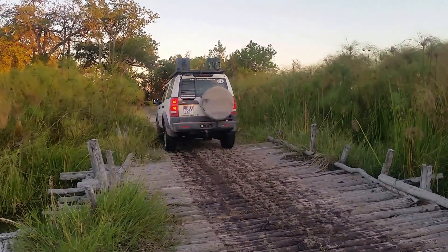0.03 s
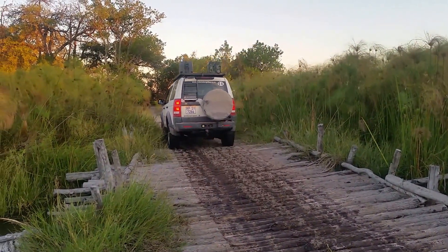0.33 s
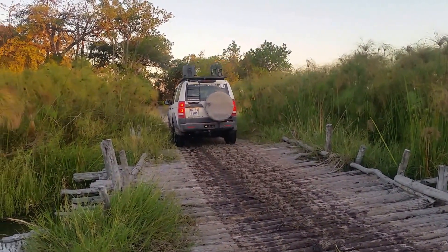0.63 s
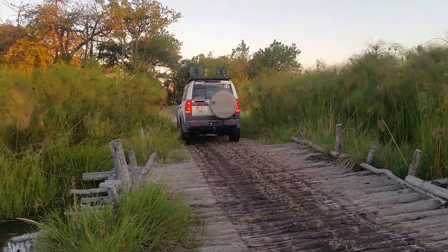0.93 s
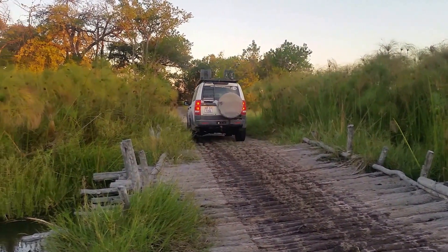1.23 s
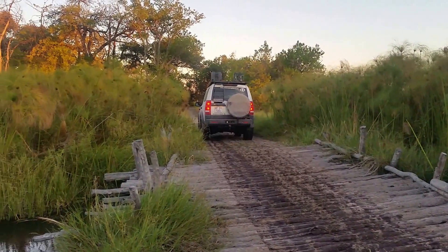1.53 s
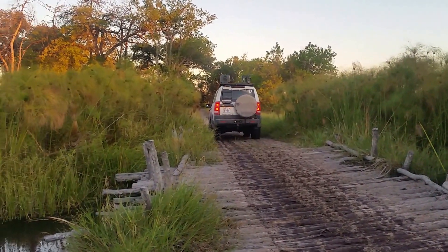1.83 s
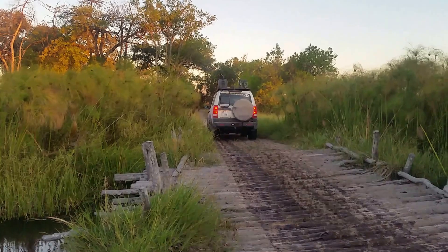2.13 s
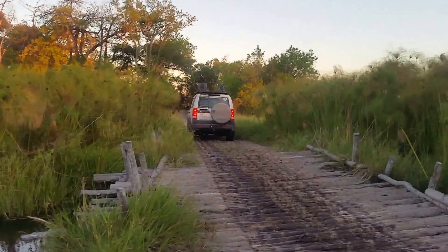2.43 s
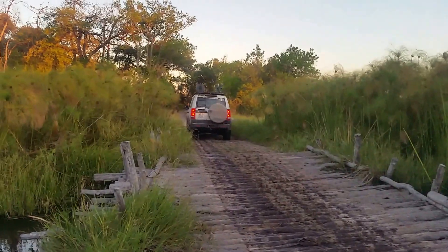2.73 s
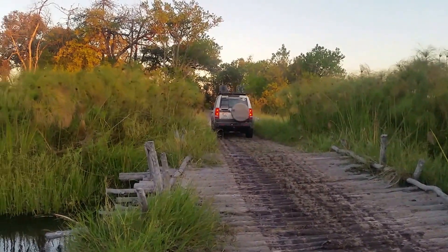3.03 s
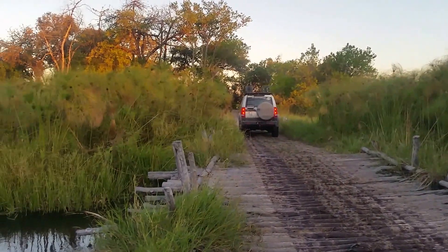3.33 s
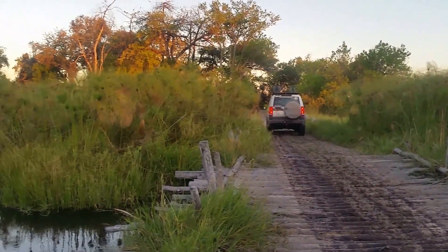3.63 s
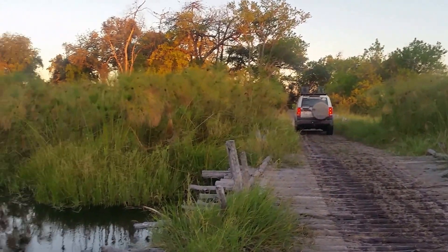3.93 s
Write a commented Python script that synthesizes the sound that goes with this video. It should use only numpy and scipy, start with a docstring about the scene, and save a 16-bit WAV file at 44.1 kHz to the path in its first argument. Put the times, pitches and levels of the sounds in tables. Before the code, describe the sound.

Loose logs knock and clatter unevenly under an off-road car's tyres, busiest in the first 1.5 seconds and easing slightly as it crawls away. The bridge rumbles and grit crackles. The low engine hum swells around 0.6 seconds, then settles. Distant marsh insects shrill steadily for all four seconds. Dry reeds rustle from about 2.3 to 3 seconds, and a frog clinks at 2.3 and 3.3 seconds.

```python
"""Loose logs knock and clatter under the tyres of an off-road car crawling away over a bridge.
Each log rings, chatters on its neighbours and grinds; the deck rumbles, the engine hums low and grit
crackles and scuffs under the wheels. Around it lies a marsh: distant insects merge into one shrill band,
and later dry reeds rustle and a reed frog clinks twice."""
import sys
import numpy as np
from scipy import signal
from scipy.fft import rfft, irfft, next_fast_len
from scipy.io import wavfile
from scipy.ndimage import uniform_filter1d, map_coordinates

SR = 44100
rng = np.random.default_rng(int(sys.argv[2]) if len(sys.argv) > 2 else 0)


def unload_wav(signal):
    """Save mono or channel-first audio to the path in sys.argv[1] as 16-bit WAV at rate SR, clipped to [-1, 1]."""
    wavfile.write(
        sys.argv[1],
        SR,
        np.round(np.clip(np.atleast_2d(signal).T, -1, 1) * 32767).astype(np.int16),
    )


N = 176400

# The big hits. Each row: start in seconds, then thud, body, clack and edge levels in dB.
KNOCKS = [(0.091, -27, -21, -37, -56), (0.277, -41, -22.5, -36, -44), (0.288, -33, -20, -18, -31),
          (0.316, -34, -24, -29, -58), (0.340, -22, -19, -37.5, -56), (0.361, -57, -19.5, -25.5, -44),
          (0.43, -19.5, -25, -35.5, -62), (0.485, -24, -28, -31.5, -44), (0.615, -32, -22, -29.5, -43),
          (0.783, -20, -21, -31.5, -50), (0.894, -43, -44, -38.5, -42), (0.917, -27, -21, -32, -43),
          (1.006, -47, -43, -45, -40.5), (1.046, -29, -26, -29.5, -56), (1.106, -28, -24, -23.5, -31.5),
          (1.155, -26, -25.5, -31.5, -53), (1.366, -24.5, -26, -37.5, -59), (1.395, -36, -31, -33, -58),
          (1.454, -22, -23, -28.5, -47), (1.472, -28, -21, -23.5, -55), (1.565, -26, -28, -28, -39),
          (1.679, -32, -29.5, -40, -52), (1.961, -18, -23.5, -26.5, -42), (1.983, -25.5, -28, -31, -54),
          (2.06, -34.5, -36, -29.5, -42), (2.085, -22.5, -26.5, -29, -47), (2.304, -36, -28, -27, -43),
          (2.559, -24.5, -30.5, -32.5, -43.5), (2.669, -23.5, -35, -38.5, -42.5),
          (2.867, -27.5, -29.5, -37.5, -47.5), (3.022, -24.5, -43, -35, -51), (3.067, -22.5, -31, -31, -46),
          (3.131, -26.5, -29.5, -35, -62), (3.205, -23.5, -33.5, -28, -36.5),
          (3.504, -31, -33.5, -38.5, -62), (3.635, -29.5, -35.5, -35.5, -60), (3.849, -36, -62, -32, -57),
          (3.973, -21, -33, -33.5, -41)]
# The small knocks between them: starting thud, body, clack and edge levels in dB.
JOSTLE = [-34, -41.5, -42.5, -53.5]
# What those four parts lose as the car pulls away, in dB.
JOSTLE_FADE = [0.77, 17, 5.5, 2.7]
def logs(jostles=70, jostles_per_s=17, scatter_db=2, wet_db=-12.5):
    """Loud knocks as wheels drop on loose logs, small ones all the while."""
    out = np.zeros(N)
    for s, *parts_db in KNOCKS:
        add(out, s, knock(parts_db))
    for k in range(jostles):
        s = (k + rng.random()) / jostles_per_s
        parts_db = np.array(JOSTLE) - np.array(JOSTLE_FADE) * s * SR / N
        add(out, s, knock(parts_db + scatter_db * rng.normal()))
    return out + amp(wet_db) * widened(marsh_reverb(out))


# The ring of a log. Each row: pitch in Hz, relative level in dB, time to fall 60 dB in seconds.
LOG_MODES = [(97.4, -8, 0.2), (131.3, 3, 0.15), (179.3, 0, 0.12), (230.9, 0, 0.11), (284, 3, 0.11),
             (481, 0, 0.093), (570.5, 3, 0.091), (715.4, -1, 0.066), (1000, 2.5, 0.045), (1236, 0.5, 0.037),
             (1530, -11, 0.045)]
# Bark grinding as the log settles. Each row: frequency in Hz, relative level in dB.
CRUNCH = [(300, 2), (400, 0.5), (560, -7.5), (800, -16), (1250, 5.5), (1600, -17), (2100, -5)]
# Crossovers around thud, body, clack and edge, in Hz.
PART_EDGES_HZ = [60, 200, 450, 900, 2100]
def knock(parts_db, hits=6, detune=.086, chatter_s=.04, chatter_fall_db=19, crunch_s=.032, crunch_db=-5.5):
    """A struck log rings at its own pitch, chatters and grinds; rebounds are duller than the blow."""
    t = np.arange(SR // 6) / SR
    f = np.fft.rfftfreq(len(t), 1 / SR)
    hz, db, t60 = np.transpose(LOG_MODES)
    pitch = hz * np.exp(detune * rng.uniform(-1.5, 1.5, len(hz)))
    swell = 1 - np.exp(-t * hz[:, None] / .77)  # low modes take longer to build
    decay = amp(db[:, None] - 60 * t / t60[:, None])
    modes = np.sin(2 * np.pi * pitch[:, None] * t) * decay * swell
    lateness = np.maximum(np.arange(hits) - rng.random(hits), 0) / (hits - 1)
    hit_samples = (lateness * chatter_s * SR).astype(int)
    signs = rng.choice([-1, 1], hits)
    attack = 1 - np.exp(-t / .00085)
    out = np.zeros(len(t))
    for lo, hi, level in zip(PART_EDGES_HZ, PART_EDGES_HZ[1:], parts_db):
        damping = (lo / PART_EDGES_HZ[0]) ** .2  # higher parts die sooner
        contacts = np.bincount(hit_samples, signs * amp(-chatter_fall_db * damping * lateness))
        ring = signal.fftconvolve(contacts, ((hz >= lo) & (hz < hi)) @ modes)[:len(t)]
        bark_tone = ((f >= lo) & (f < hi)) * amp(along(CRUNCH, f))
        bark = irfft(rfft(rng.standard_normal(len(t))) * bark_tone, len(t))
        crunch = bark * attack * np.exp(-t * damping / crunch_s)
        out += amp(level) * unit(unit(ring) + amp(crunch_db) * unit(crunch))
    return out * np.sqrt(.03 / t[-1])  # each part has the energy of 30 ms at its level


# The tone of the deck. Each row: frequency in Hz, relative level in dB.
RUMBLE = [(18, -26), (30, -28), (52, -4.5), (85, -2.5), (190, -1), (260, -7), (380, -17), (580, -14),
          (830, -23), (1250, -26.5), (1900, -29), (2600, -55)]
def rumble(start_db=-28.5, fade_db=2.5, lumpy_db=2, rattle_hz=280, rattle_db=3.5):
    """The deck rumbles and rattles under the rolling tyres in uneven lumps, fading with distance."""
    level = start_db - fade_db * np.arange(N) / N + lumpy_db * wobble(18)
    roll = amp(level) * widened(coloured(rng.standard_normal((2, N)), RUMBLE))
    return flicker_above(roll, rattle_hz, rattle_db * np.clip(wobble(30.04), -1.5, 1.5))


# The revs. Each row: time in seconds, firing rate in Hz, overall level in dB.
REVS = [(0.0, 84.3, -37), (0.6, 96.13, -26.5), (1.21, 76.2, -39), (1.41, 84.62, -38.5), (3.8, 78.05, -36.5),
        (4.0, 71, -42)]
# The partials of the hum. Each row: multiple of the firing rate, level offset in dB.
ENGINE_ORDERS = [(2 / 3, -13), (1, -3.5), (2, -14), (3, -19)]
def engine(jitter=.015, uneven_db=2):
    """The exhaust hums low at the firing rate, each partial wavering on its own."""
    hz, db = curves(REVS)
    phase = 2 * np.pi * np.cumsum(hz * (1 + jitter * wobble(19))) / SR
    return sum(np.sqrt(2) * amp(db + offset + uneven_db * wobble(12)) * np.sin(order * phase)
               for order, offset in ENGINE_ORDERS)


# The tone of the grit. Each row: frequency in Hz, relative level in dB.
GRIT = [(1500, 1.5), (2300, 0), (2750, 5), (3300, 6), (4600, 1.5), (6500, -1), (8200, 7.5), (9400, -1.5),
        (12000, -1.5), (15800, -8)]
# Its fade-out. Each row: time in seconds, gain in dB.
GRIT_FADE = [(0, -47), (1, -50), (2.3, -51), (3.1, -53.5), (3.55, -56), (4, -57.5)]
def grit(clicks_per_s=130, click_db=1, hiss_db=6.5, scuff_hz=6500, scuff_db=2):
    """Sand and bark crackle under the tyres: dry clicks and hiss in short scuffs."""
    crackle = amp(click_db) * coloured(clicks(clicks_per_s), GRIT)
    hiss = amp(hiss_db) * coloured(patchy_noise(), GRIT)
    scuffed = flicker_above(crackle + hiss, scuff_hz, scuff_db * wobble(30))
    return scuffed * amp(curves(GRIT_FADE)[0])


# Sharp accents over the grit. Each row: start in seconds, relative level in dB, centre pitch in Hz.
SNAPS = [(0.084, -29, 8100), (0.290, -32, 3160), (0.402, -32, 7750), (0.782, -29, 8300), (1.125, -37, 8300),
         (1.192, -33, 7600), (1.756, -32.5, 8000), (2.060, -31, 2990), (2.468, -26.5, 8250),
         (2.63, -39, 7600), (2.888, -33.5, 10950), (3.203, -39, 8700), (3.574, -42, 8400),
         (3.77, -38.5, 7860), (3.857, -42, 6900), (3.978, -32, 2970)]
def snaps(half_width_hz=1200, decay_s=.0038):
    """Bark and twigs snap, each a tiny burst of pitched noise."""
    out, t = np.zeros(N), np.arange(SR // 20) / SR
    f = np.fft.rfftfreq(len(t), 1 / SR)
    for s, db, hz in SNAPS:
        resonance = 1 / (1 + ((f - hz) / half_width_hz) ** 2)
        crack = unit(irfft(rfft(rng.standard_normal(len(t))) * resonance, len(t)))
        add(out, s, amp(db) * crack * np.exp(-t / decay_s))
    return out


# Two tyre scuffs, then reeds. Each row: peak time in seconds, relative level in dB, half length in seconds.
SWELLS = [(0.054, -38, 0.027), (1.425, -45, 0.018), (2.237, -39.5, 0.02), (2.34, -33, 0.039),
          (2.522, -36, 0.077), (2.912, -40, 0.15), (3.78, -47, 0.051)]
# Their bright tone. Each row: frequency in Hz, relative level in dB.
SWELL_TONE = [(3000, -10.5), (5500, -13), (7500, -1), (10000, -2.5), (13000, -4), (15800, -5)]
def scuffs_and_rustles(scratches_per_s=500, scratch_db=-2, flutter_db=1.2):
    """Short bright swells of hiss and scratches: tyres scuffing grit early on, dry reeds rustling later."""
    t = np.arange(N) / SR
    swell = sum(amp(db) * np.exp(-.5 * ((t - s) / length) ** 2) for s, db, length in SWELLS)
    flutter = amp(flutter_db * wobble(50))
    texture = unit(patchy_noise()) + amp(scratch_db) * unit(clicks(scratches_per_s))
    return swell * flutter * coloured(texture, SWELL_TONE)


# The frog's calls. Each row: start in seconds, relative level in dB, starting pitch in Hz.
CLINKS = [(2.349, -24.5, 2764), (3.347, -23, 2850)]
def frog(sag_hz_per_s=7000, rise_s=.0014, fall_s=.0035, wet_db=-13, pan_db=-4):
    """Each call is one short, falling glassy ring with an echo from the reeds."""
    out, t = np.zeros(N), np.arange(SR // 10) / SR
    envelope = (1 - np.exp(-(t / rise_s) ** 2)) * np.exp(-t / fall_s)
    for s, db, hz in CLINKS:
        tone = unit(np.sin(2 * np.pi * (hz - sag_hz_per_s * t / 2) * t))
        add(out, s, amp(db) * tone * envelope)
    return (out + amp(wet_db) * marsh_reverb(out)) * balance(pan_db)


# The tone of the chorus. Each row: frequency in Hz, relative level in dB.
INSECTS = [(2200, -82), (2700, -22.5), (3200, -18.5), (3500, -12), (3800, -4.5), (4080, -3.5), (4330, -4),
           (4520, -17.5), (4800, -35)]
def insects(level_db=-39.5, shimmer_db=.4, pan_db=-6):
    """A distant chorus, so many callers that they merge into one shrill band."""
    chorus = coloured(rng.standard_normal((2, N)), INSECTS)
    return chorus * amp(level_db + shimmer_db * wobble(10)) * balance(pan_db)


# The marsh's short tail. Each row: frequency in Hz, time to fall 60 dB in seconds.
MARSH_DECAY = [(100, 0.084), (600, 0.36), (3000, 0.16), (10000, 0.077)]
def marsh_reverb(x):
    """Sound scatters from the reed banks in two unrelated tails."""
    hz, t, z = signal.stft(rng.standard_normal((2, SR // 2)), SR, nperseg=256)
    tail = signal.istft(z * amp(-60 * t / along(MARSH_DECAY, hz)[:, None]), SR, nperseg=256)[1]
    return signal.fftconvolve(x[None], tail / np.linalg.norm(tail[0]), axes=1)[:, :N]


# Stereo width. Each row: frequency in Hz, left-right likeness (1 is mono).
LIKENESS = [(30, 0.85), (100, 0.99), (500, 0.98), (1000, 0.17), (2000, 0.16)]
def widened(pair):
    """Two unrelated signals to stereo: nearly mono in the bass, wide higher up."""
    def weights(hz):
        angle = np.arccos(np.clip(along(LIKENESS, hz), -1, .998)) / 2
        return np.array([np.cos(angle), np.sin(angle)])
    mid, side = filtered(pair, weights)
    return np.array([mid + side, mid - side])


def clicks(per_s, scatter_db=6):
    """Dry clicks of scattered size, reaching each side with a different strength."""
    onsets = rng.random(N) < per_s / SR
    sizes = amp(scatter_db * np.clip(rng.standard_normal((2, N)), -2, 2))
    return onsets * sizes * rng.choice([-1, 1], (2, N))


def patchy_noise(depth_db=2.3):
    """Two noises whose gain varies in small patches of time and pitch."""
    z = signal.stft(rng.standard_normal((2, N)), nperseg=256)[2]
    patches = uniform_filter1d(rng.standard_normal(z.shape[1:]), size=5, axis=0)
    patches = uniform_filter1d(patches, size=10, axis=1)
    return signal.istft(z * amp(depth_db * unit(patches)), nperseg=256)[1][:, :N]


def flicker_above(x, corner_hz, gain_db):
    """Ride the level of everything above the corner."""
    highs = filtered(x, lambda hz: hz ** 4 / (hz ** 4 + corner_hz ** 4))
    return x + highs * (amp(gain_db) - 1)


def amp(db):
    """Decibels to gain."""
    return 10 ** (np.asarray(db) / 20)


def unit(x):
    """Scale to rms 1."""
    return x / np.sqrt(np.mean(x ** 2) + 1e-20)


def along(points, hz):
    """Read (Hz, value) points on a log axis."""
    f, v = np.transpose(points)
    return np.interp(np.log(hz + 1), np.log(f + 1), v)


def curves(rows):
    """One value per sample for each column after the time."""
    s, *cols = np.transpose(rows)
    return [np.interp(np.arange(N) / SR, s, c) for c in cols]


def wobble(rate):
    """A smooth random curve, rate knots a second."""
    return map_coordinates(rng.standard_normal(400), [np.arange(N) * rate / SR], mode="wrap")


def filtered(x, response):
    """Shape x with a gain for each frequency."""
    m = next_fast_len(N + SR // 2)
    return irfft(rfft(x, m) * response(np.fft.rfftfreq(m, 1 / SR)), m)[..., :N]


def coloured(x, spectrum):
    """x with a (Hz, dB) colour, at rms 1."""
    return unit(filtered(x, lambda hz: amp(along(spectrum, hz))))


def balance(db):
    """Stereo gains with the left db above the right."""
    return amp(np.outer([.5, -.5], db))


def panned(x, pan):
    """Left-right balance by frequency."""
    return filtered(x, lambda hz: balance(along(pan, hz)))


def add(track, s, sound):
    """Mix a sound in at time s."""
    part = track[max(0, round(s * SR)):][:len(sound)]
    part += sound[:len(part)]


# Where the car and the crisp sounds sit. Each row: frequency in Hz, left minus right in dB.
CAR_PAN = [(60, 0.6), (250, -1.5), (500, -2.5), (1500, -1.5), (2500, 6)]
TREBLE_PAN = [(2000, -11.5), (4000, -7), (5400, -19.5), (6800, -13), (8000, -9), (9200, -3), (11000, 6),
              (15000, -3)]
def scene():
    """The car on the bridge, slightly right, within the marsh."""
    car = panned(logs() + rumble() + engine(), CAR_PAN)
    crisp = panned(grit() + snaps() + scuffs_and_rustles(), TREBLE_PAN)
    return car + crisp + insects() + frog()


def record(dry):
    """Cut everything above 16 kHz."""
    return filtered(dry, lambda hz: hz < 16000)


dry = scene()
out = record(dry)
unload_wav(out)
```